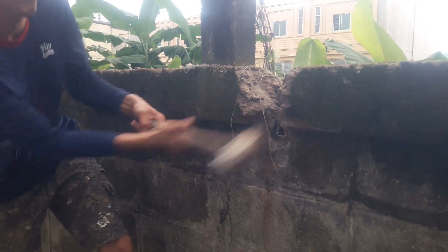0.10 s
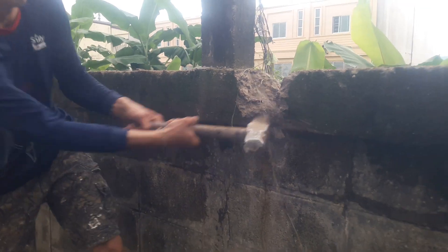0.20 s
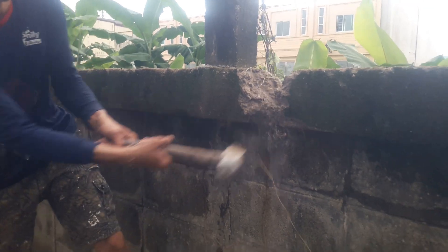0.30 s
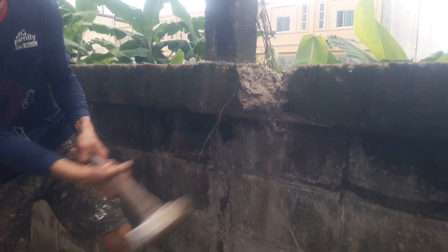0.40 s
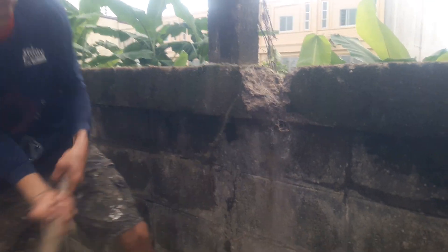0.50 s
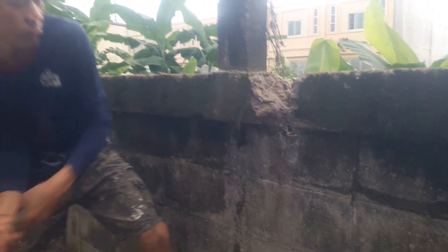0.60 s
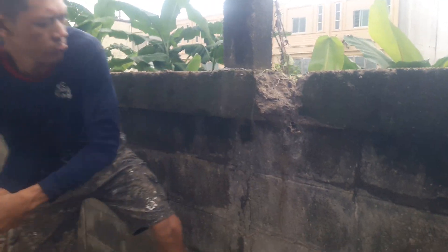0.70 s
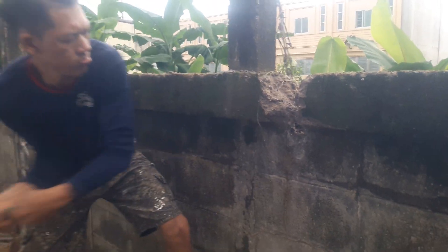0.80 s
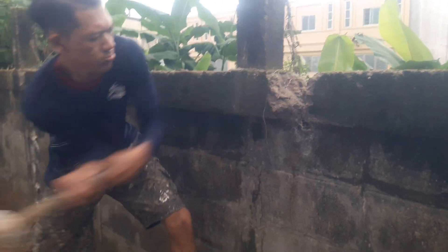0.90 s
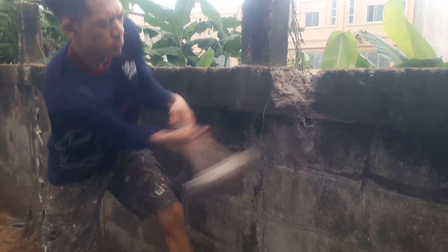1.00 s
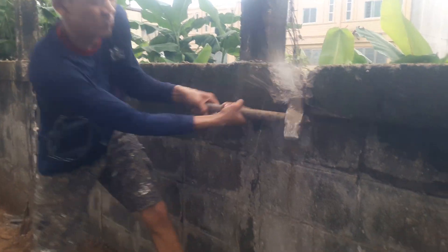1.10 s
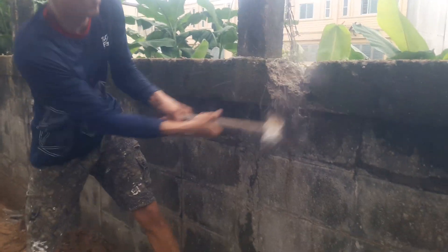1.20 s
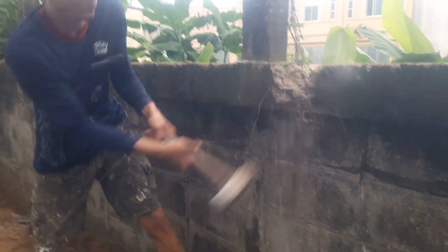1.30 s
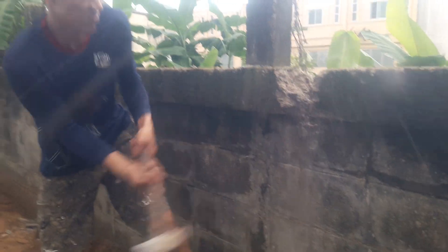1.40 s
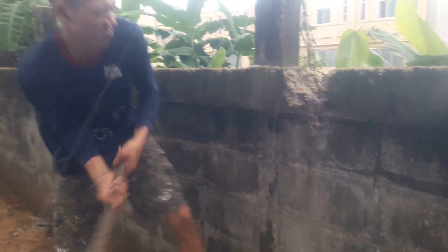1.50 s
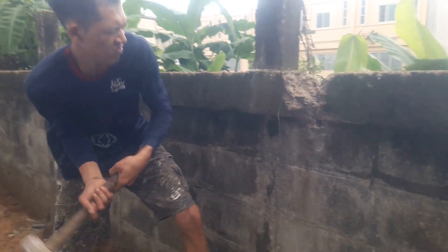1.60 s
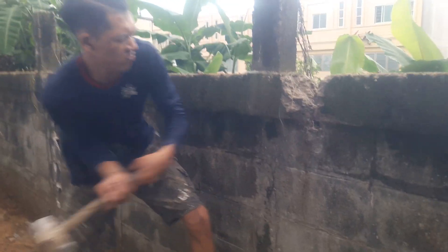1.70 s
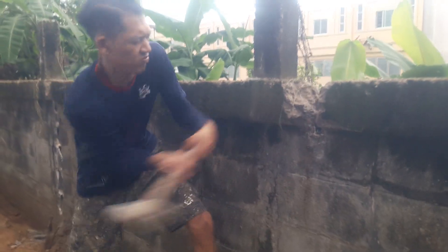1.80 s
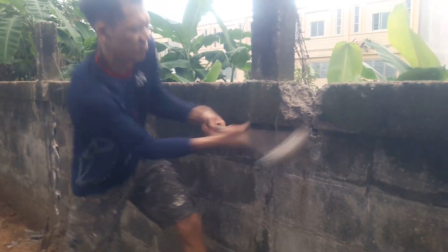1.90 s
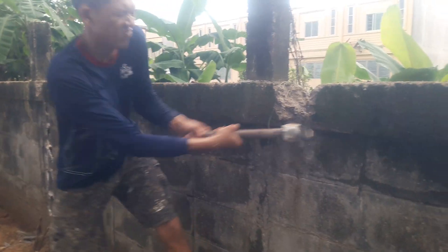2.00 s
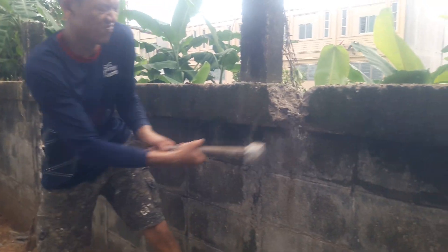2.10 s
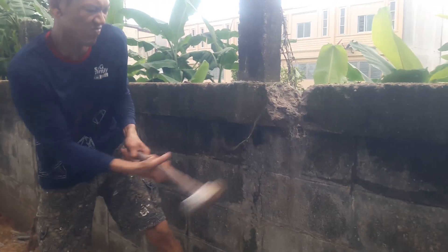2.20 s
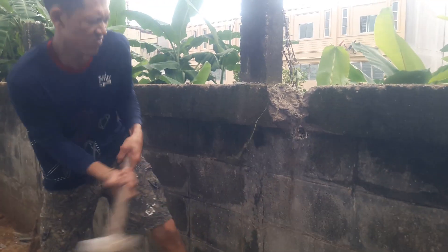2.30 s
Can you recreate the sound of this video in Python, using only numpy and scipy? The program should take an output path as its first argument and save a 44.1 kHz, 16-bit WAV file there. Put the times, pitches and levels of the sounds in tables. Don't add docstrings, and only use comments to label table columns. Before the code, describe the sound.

Three heavy hammer blows thump a concrete block wall outdoors, with crumbling mortar and knocking lumps

```python
import sys
import numpy as np
from scipy import signal
from scipy.fft import rfft, irfft
from scipy.io import wavfile
from scipy.ndimage import uniform_filter1d

SR = 44100
rng = np.random.default_rng(int(sys.argv[2]) if len(sys.argv) > 2 else 0)


def voltage_ratio(decibels):
    exponent = np.asarray(decibels, float) / 20
    return 10 ** exponent


def transcribe(signal):
    frames = np.atleast_2d(signal).T
    limited = np.clip(frames, -1, 1)
    pcm = np.round(limited * 32767).astype(np.int16)
    wavfile.write(sys.argv[1], SR, pcm)


N = 103635


def at_hz(points, hz):
    table_hz, value = np.transpose(points)
    return np.interp(np.log(hz), np.log(table_hz), value)


def rms_one(x):
    return x / np.sqrt(np.mean(x ** 2) + 1e-20)


def peak_one(x):
    return x / np.abs(x).max()


def butter(x, order, hz, kind):
    return signal.sosfilt(signal.butter(order, hz, kind, fs=SR, output="sos"), x)


def colour(x, points):
    hz = np.fft.rfftfreq(len(x), 1 / SR) + 1
    return irfft(rfft(x) * voltage_ratio(at_hz(points, hz)), len(x))


def ring(x, hz, t60_s):
    radius = voltage_ratio(-60 / (t60_s * SR))
    w = 2 * np.pi * min(hz, 0.45 * SR) / SR
    return signal.lfilter([0, np.sin(w)], [1, -2 * radius * np.cos(w), radius ** 2], x + 1e-18)


def grains(size, per_s, spread_db):
    sizes = voltage_ratio(spread_db * np.minimum(rng.exponential(1, size), 5))
    signs = rng.choice([-1, 1], size)
    return sizes * signs * (rng.random(size) < per_s / SR)


def add(out, start_s, x):
    i = int(start_s * SR)
    out[i:i + len(x)] += x[:len(out) - i]


# f/Hz, level/dB
AIR_COLOUR = [(15, -64), (25, -33), (178, -24), (224, -1), (325, 12.5), (383, -20), (434, 3.5), (1410, 2),
              (3500, -40), (4550, -63), (7700, -120)]
# f/Hz, width/Hz, level/dB
HUM_BANDS = [(123, 56, -66), (163.5, 23, -53), (326.4, 29, -57.5), (9400, 270, -82.5)]


def air():
    air_db = -62.5
    out = voltage_ratio(air_db) * rms_one(colour(rng.standard_normal(N), AIR_COLOUR))
    for hz, width_hz, db in HUM_BANDS:
        hum = ring(rng.standard_normal(N + SR), hz, 1.84 / width_hz)[SR:]
        out += voltage_ratio(db) * rms_one(hum)
    return out


# t/s, level/dB
GRIT_FLOW = [(0, -52.5), (.2, -55), (.45, -79), (.715, -64), (.74, -57.5), (.95, -57.5), (1.131, -62),
             (1.38, -61.5), (1.5, -64), (1.59, -62), (1.61, -56), (1.652, -60), (1.668, -48),
             (1.705, -47.5), (1.725, -52.5), (1.8, -54), (1.935, -53.5), (1.95, -53), (1.972, -48),
             (1.985, -48), (2.0, -48.5), (2.2, -51.5), (2.35, -53.5)]
# f/Hz, level/dB
GRIT_SPECTRUM = [(500, 9), (900, 4), (2200, 5.5), (3800, -5), (6500, -11), (15500, -10)]


def grit():
    grains_per_s, gain_db, spurt_db = 1200, 0.5, 2.0
    dull_hz, dull_db_per_db = 9050, 0.54
    s, db = np.transpose(GRIT_FLOW)
    flow_db = np.interp(np.arange(N) / SR, s, db)
    steps = np.repeat(rng.standard_normal(N // 300 + 1), 300)[:N]
    spurts = uniform_filter1d(steps, size=200)
    dust = 6.9 * rng.standard_normal(N)
    noise = rms_one(colour(grains(N, grains_per_s, 1.5) + dust, GRIT_SPECTRUM))
    low = butter(noise, 4, dull_hz, "low")
    top = butter(noise, 4, dull_hz, "high")
    top *= voltage_ratio(dull_db_per_db * np.minimum(flow_db - np.median(db), 0))
    return voltage_ratio(flow_db + gain_db + spurt_db * spurts) * (low + top)


def fragments(rows, burst_s):
    ring_cycles = 7.0
    out, t = np.zeros(N), np.arange(SR // 20) / SR
    burst = np.exp(-3 * t / burst_s)
    for s, db, hz, bright_db in rows:
        clicks = (grains(len(t), 3000, 2.0) + 4 * (t == 0)) * burst
        tone = ring(ring(clicks, hz, ring_cycles / hz), hz, 1.08 / hz)
        snap = signal.lfilter([1, 0.4], [1], rng.standard_normal(len(t))) * burst
        hit = peak_one(tone) + voltage_ratio(bright_db) * peak_one(snap)
        add(out, s, voltage_ratio(db) * peak_one(hit))
    return butter(out, 2, 480, "high")


# t/s, peak level/dB, f/Hz, snap level/dB
LONE_CHIPS = [(.0105, -25, 10400, -27), (.0787, -25, 2380, -11), (.160, -37, 1580, -5),
              (.5003, -26, 1870, -15.5), (.5425, -41.5, 5950, -26), (.5826, -23, 1730, -27),
              (.7317, -42, 5070, 1.5), (.7716, -38.5, 8500, -16.5), (.8255, -40.5, 990, -7),
              (.8495, -33.5, 2020, -14), (.872, -44, 5500, 6), (1.083, -48, 5500, 18),
              (1.1315, -35.5, 1560, -14), (1.4915, -45, 14100, -18), (1.579, -36.5, 3100, -31)]
LUMP_CHIPS = [(1.6575, -33, 5050, -15), (1.6606, -25.5, 4950, -2), (1.689, -47, 5300, -15),
              (1.603, -53, 3000, 5), (1.737, -37, 11400, -3), (1.7714, -40, 3970, 0),
              (1.8173, -39.5, 6530, 18), (1.838, -39, 6640, -22), (1.984, -29, 6500, -1),
              (1.8741, -38, 7500, 1), (1.9180, -30, 4470, 6), (1.9215, -29, 6350, -6),
              (1.9488, -23, 13000, -23), (1.9535, -37, 6800, 4), (1.9575, -38, 7050, 12),
              (1.9598, -24, 7600, 10), (1.9650, -33, 6000, 8), (2.185, -38.5, 5730, 1),
              (2.258, -38, 12000, 0)]


def falling_chips():
    return fragments(LONE_CHIPS, burst_s=0.009) + fragments(LUMP_CHIPS, burst_s=0.006)


# f/Hz, t60/s
YARD_DECAY = [(50, 1.6), (150, 0.89), (400, 0.79), (1000, 0.8), (2500, 0.62), (6000, 0.46), (15000, 0.25)]
# f/Hz, level/dB
YARD_SPECTRUM = [(100, -3.5), (200, -7), (300, 0.5), (700, -3.5), (2000, -4), (4000, 1.5), (15000, 4.5)]
ECHO_S = 0.0270


def yard(x):
    level_db, rise_s = -5 - 38, 0.012
    late_db, late_stretch = -31.5, 2.44
    swell_db, swell_s = -2, 0.0058
    size = int(1.5 * SR)
    t, tail = np.arange(size) / SR, np.zeros(size)
    edges_hz = 35 * 2 ** np.arange(0, 9.1, 0.5)
    white = rng.standard_normal((2, size))
    for k, (low_hz, high_hz) in enumerate(zip(edges_hz, edges_hz[1:])):
        hz = np.sqrt(low_hz * high_hz)
        fall_db = -60 * t / at_hz(YARD_DECAY, hz)
        decay = voltage_ratio(fall_db) + voltage_ratio(late_db + fall_db / late_stretch)
        band = butter(white[k % 2], 2, [low_hz, high_hz], "band")
        tail += band * voltage_ratio(at_hz(YARD_SPECTRUM, hz)) * decay
    swell = voltage_ratio(swell_db) * np.exp(-((t - ECHO_S - swell_s / 2) / swell_s) ** 2)
    tail *= voltage_ratio(level_db) * (1 - np.exp(-t / rise_s) + swell)
    return signal.fftconvolve(x, tail)[:N]


# t/s, level/dB, f/Hz, t60/s
WIRE_TINGS = [(.121, -55, 4700, .07), (.131, -59, 4640, .05), (.149, -56, 4720, .06),
              (.648, -66, 4200, .07)]


def wire_tings():
    out, tap = np.zeros(N), np.eye(1, SR // 2)[0]
    for s, db, hz, t60_s in WIRE_TINGS:
        add(out, s, voltage_ratio(db) * ring(tap, hz, t60_s))
    return out


# t/s, level/dB, steel level/dB, crumble level/dB, crumble t60/s
HAMMER_BLOWS = [
    (0.2152, -1, -66, -15, 0.29),
    (1.1420, -2.5, -40.5, -21.5, 0.28),
    (2.0070, -1.5, -38, -18, 0.35),
]
# f/Hz, width/Hz, level/dB
BLOCK_MODES = [
    [(167, 82, -13.5), (247, 200, -30), (441.5, 59, 3.5), (690, 51, -3), (917, 42, -9), (1245, 37, 1.5),
     (2030, 230, -23)],
    [(190, 85, -5.5), (300, 47, -11), (457.7, 54, 5.5), (600, 73, 5), (760, 63, -6), (1040, 53, -7),
     (1350, 190, -7), (2110, 500, -20)],
    [(161, 55, -6.5), (250, 35, -9.5), (380, 16, -6.5), (461, 55, -2), (783, 83, 3), (1140, 190, -13),
     (1920, 710, -17)],
]
# blow index, delay/s, level/dB
CONTACTS = [(0, 0.0, -16), (0, .0012, 6), (0, .0056, -6), (0, .0100, -8), (0, .0213, -1), (0, .045, -8),
            (1, 0.0, -14), (1, .0011, 2), (1, .0097, -3), (1, .0140, -5), (1, .0226, -8), (2, 0.0, -5),
            (2, .0026, -2), (2, .0064, 1), (2, .0108, -4), (2, .0195, -4), (2, .0243, -5), (2, .055, -10)]
# f/Hz, level/dB, t60/s
STEEL_MODES = [(9075, -4, .24), (9040, -9, .18), (13015, -3, .3), (13052, -10, .2), (9615, -10, .12)]


def blows():
    contact_hz = 1860
    block, steel = np.zeros(N), np.zeros(N)
    tap = np.eye(1, SR // 2)[0]
    for k, (s, db, steel_db, _, _) in enumerate(HAMMER_BLOWS):
        push = np.zeros(SR // 2)
        for blow, delay_s, contact_db in CONTACTS:
            if round(blow) == k:
                push[int(delay_s * SR)] -= voltage_ratio(contact_db)
        push = butter(push, 2, contact_hz, "low")
        body = np.zeros(len(push))
        for hz, width_hz, mode_db in BLOCK_MODES[k]:
            body += voltage_ratio(mode_db) * np.sqrt(width_hz) * ring(push, hz, 2 / max(width_hz, 40))
        add(block, s, voltage_ratio(db) * peak_one(body))
        for hz, mode_db, t60_s in STEEL_MODES:
            add(steel, s, voltage_ratio(steel_db + mode_db) * ring(tap, hz, t60_s))
    return block, steel


# t/s, peak level/dB, f/Hz
MORTAR_CRACKS = [(.2158, -18, 4870), (.2428, -18, 12300), (.2450, -13, 2000), (.2475, -22, 5920),
                 (.253, -25, 6000), (.2605, -15, 12300), (.2655, -22, 6230), (1.1422, -21, 5330),
                 (1.1545, -27, 6000), (1.1680, -23, 12800), (1.1868, -26, 12800), (2.0070, -17, 9000),
                 (2.0102, -22, 5200), (2.0104, -11, 2000), (2.0335, -21, 9000), (2.0385, -20, 5600),
                 (2.0550, -23, 11800)]


def cracks():
    snap_db = -7.0
    return fragments([(*row, snap_db) for row in MORTAR_CRACKS], burst_s=0.0094)


# f/Hz, level/dB
CRUMBLE_SPECTRUM = [(500, 7.5), (900, 1), (2300, -3), (3300, -16.5), (6000, -27), (12000, -27.5),
                    (15500, -33)]


def crumble():
    spray_db, spray_t60_s = 10.5, 0.089
    out, t = np.zeros(N), np.arange(SR // 2) / SR
    late_s = np.maximum(t - ECHO_S, 0)
    spray = voltage_ratio(spray_db - 60 * t / spray_t60_s) * np.clip(t / 0.007 - 0.1, 0, 1)
    for s, _, _, db, t60_s in HAMMER_BLOWS:
        noise = rms_one(colour(grains(len(t), 5000, 2.31), CRUMBLE_SPECTRUM))
        collapse = voltage_ratio(-60 * late_s / t60_s) * np.minimum(late_s / 0.005, 1)
        add(out, s, voltage_ratio(db) * (spray + collapse) * noise)
    return out


# yard send level/dB, shudder level/dB, shudder rise/s
BLOW_AFTERMATH = [(-2, -49, .046), (0, -47.5, 0.055), (-0.5, -46, 0.068)]


def footing_shudder():
    out, t = np.zeros(N), np.arange(SR // 2) / SR
    for (s, *_), (_, db, rise_s) in zip(HAMMER_BLOWS, BLOW_AFTERMATH):
        low = rms_one(ring(rng.standard_normal(len(t)), 62.5, 0.22))
        add(out, s, voltage_ratio(db) * low * t / rise_s * np.exp(1 - t / rise_s))
    return out


# t/s, peak level/dB, f/Hz, ring/cycles
LUMP_KNOCKS = [(1.6574, -20.5, 1900, 9.5), (1.661, -15.5, 1970, 11), (1.6611, -25, 1390, 9),
               (1.6612, -23, 674, 12), (1.667, -33, 1830, 4.6), (1.671, -32, 710, 5.4),
               (1.686, -35, 1780, 5.4), (1.698, -33, 1500, 5), (1.705, -40, 750, 5.6),
               (1.664, -30, 2600, 11), (1.7724, -33.5, 2100, 12), (1.8182, -37, 1947, 9.3),
               (1.9189, -23.5, 2240, 8.2), (1.9184, -43.5, 870, 7.7), (1.9190, -39, 547, 12),
               (1.9579, -17, 2670, 7), (1.9599, -14.5, 1970, 2.5), (1.9628, -22.5, 2700, 3.9),
               (1.9654, -32, 1400, 6.7), (1.9695, -31, 1310, 5.8), (0.8244, -38.5, 1970, 6.4),
               (0.826, -46, 900, 2), (1.8743, -34, 2700, 11), (1.922, -24.5, 2900, 6),
               (1.9824, -34, 3000, 4.9), (1.987, -29, 2570, 4), (1.977, -34, 3000, 4),
               (1.979, -39, 1300, 4), (1.992, -34, 1700, 5), (1.996, -38, 2800, 4)]


def knocks():
    out, tap = np.zeros(N), np.eye(1, SR // 20)[0]
    for s, db, hz, cycles in LUMP_KNOCKS:
        tone = ring(ring(tap, hz, max(cycles, 1) / hz), hz, 1.5 / hz)
        tone = butter(tone, 2, hz / 2, "high")
        add(out, s, -voltage_ratio(db) * peak_one(tone))
    return out


def scene():
    low_cut_hz, echo_db, fallen_send_db = 125, -22, 2
    block, steel = blows()
    struck = butter(block + crumble() + cracks(), 4, low_cut_hz, "high")
    fallen = butter(falling_chips() + knocks(), 4, low_cut_hz, "high")
    echo = voltage_ratio(echo_db) * np.roll(struck + steel, int(ECHO_S * SR))
    echo *= np.arange(N) > SR // 5
    latest_blow = np.searchsorted([s for s, *_ in HAMMER_BLOWS[1:]], np.arange(N) / SR)
    struck_send_db = np.array(BLOW_AFTERMATH)[latest_blow, 0]
    wet = yard(voltage_ratio(struck_send_db) * struck + voltage_ratio(fallen_send_db) * fallen)
    after = footing_shudder() + wire_tings()
    return (struck + steel + echo + fallen + wet + after + grit() + air())[None]


def roll_off(x):
    return signal.sosfilt(signal.butter(12, 16650, fs=SR, output="sos"), x)


# f/Hz, width/Hz, boost/dB
MIC_PORT = [(3860, 1650, -4.5), (5500, 2790, 7.5), (7990, 1500, -3.5), (8760, 1040, 7.5)]


def record(dry):
    for hz, width_hz, db in MIC_PORT:
        w, a = 2 * np.pi * hz / SR, np.pi * width_hz / SR
        g = voltage_ratio(db / 2)
        zeros = [1 + a * g, -2 * np.cos(w), 1 - a * g]
        poles = [1 + a / g, -2 * np.cos(w), 1 - a / g]
        dry = signal.lfilter(zeros, poles, dry)
    dry = butter(dry, 3, 42, "high")
    rounded = 1.278 * np.tanh(dry / 1.151)
    mix = signal.sosfilt(signal.cheby2(10, 40, 16100, fs=SR, output="sos"), rounded)
    return roll_off(mix)


dry = scene()
out = record(dry)
transcribe(out)
```